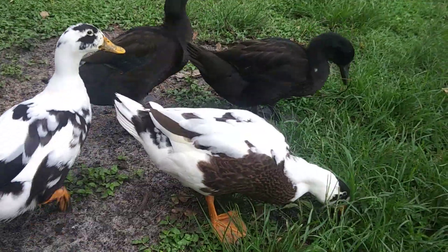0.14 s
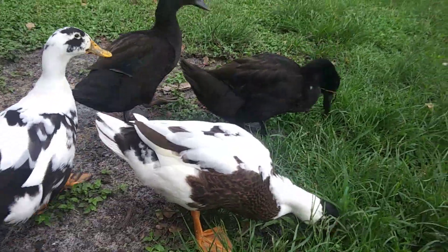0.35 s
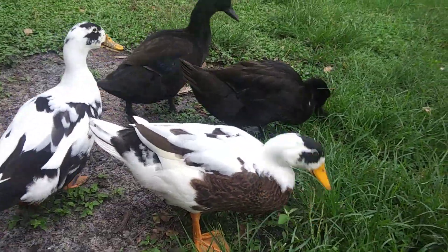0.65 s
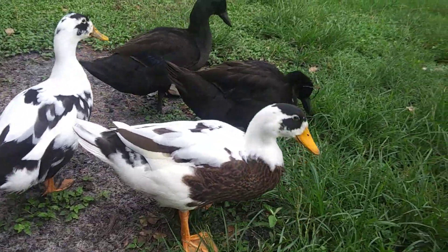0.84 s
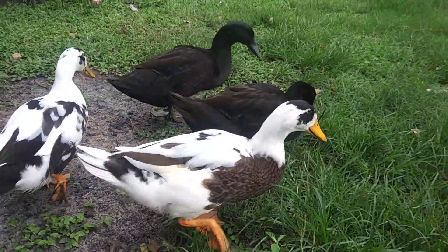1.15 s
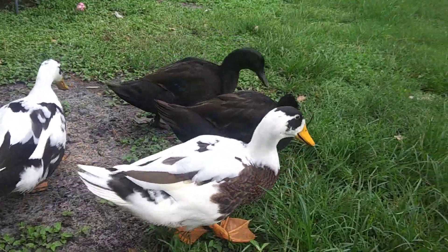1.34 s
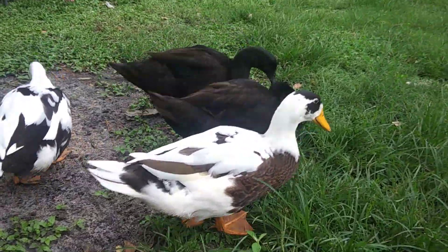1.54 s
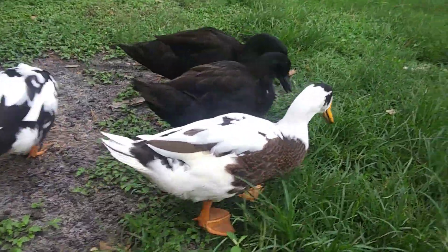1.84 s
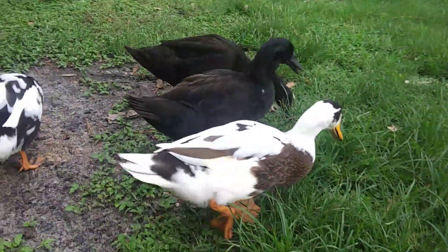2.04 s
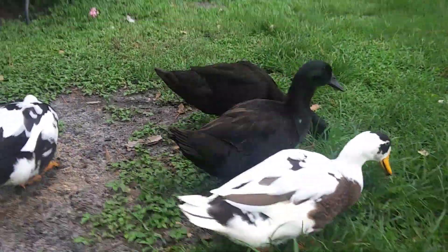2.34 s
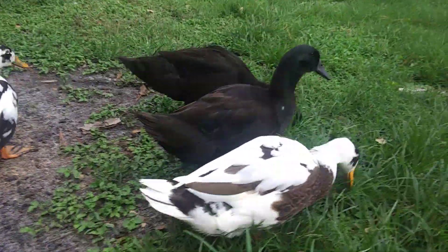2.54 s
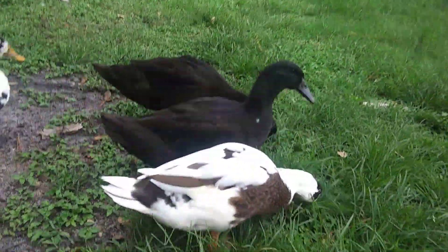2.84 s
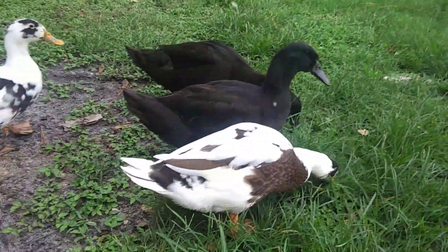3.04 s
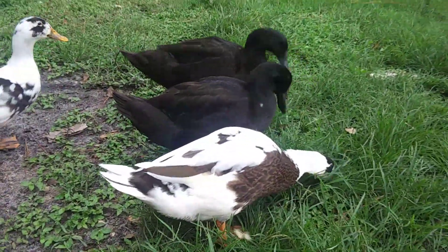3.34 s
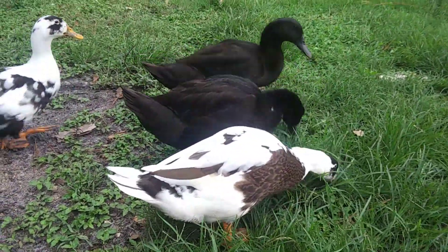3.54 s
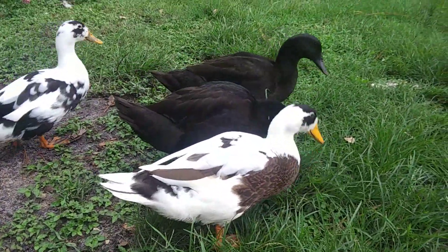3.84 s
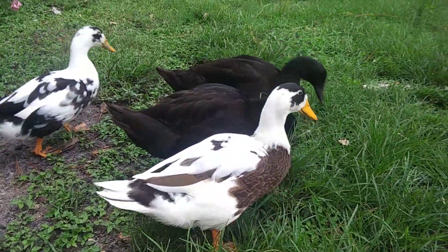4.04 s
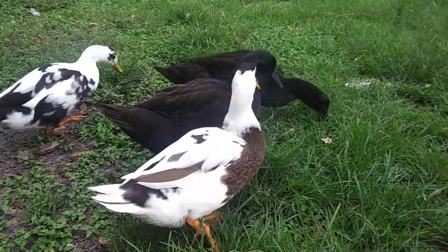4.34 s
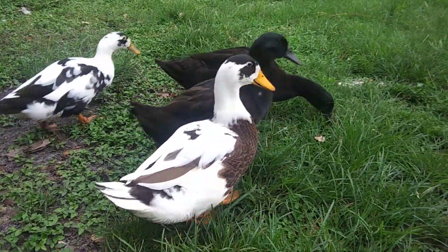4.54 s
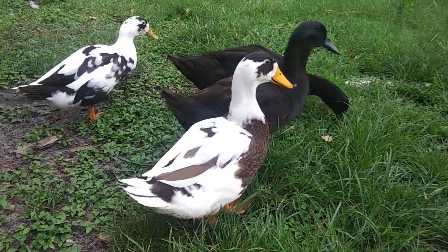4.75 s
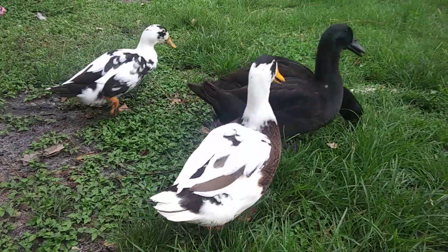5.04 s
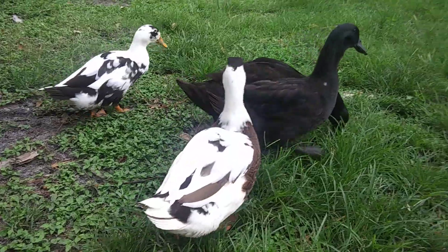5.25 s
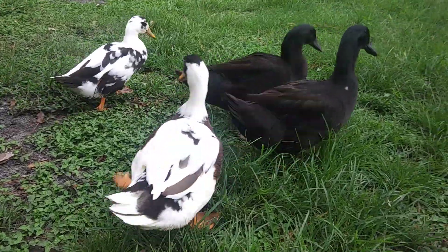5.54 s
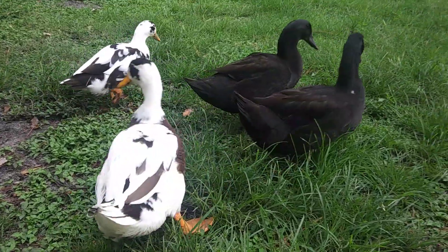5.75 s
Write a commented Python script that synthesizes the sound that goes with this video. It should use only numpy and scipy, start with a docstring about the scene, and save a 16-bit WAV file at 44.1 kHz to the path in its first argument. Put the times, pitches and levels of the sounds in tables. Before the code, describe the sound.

Close outdoor duck chatter: quick raspy quacks, falling peeps and clucks, crisp grass snaps, then a sharp honk breaking into a squeal.

```python
"""Young ducks forage on a lawn close to the microphone and keep up a soft chatter, built from membrane
slaps and puffs of air through throat resonances: rattling quacks, honks, clucks and hoarse rasps.
Gliding tones make thin peeps, a whine and, out of the last of three honks, a loud squeal.
Dull grunts, grass snaps and crackle are shaped noise; a weak yard echo, hiss and faint hum lie behind.
"""
import sys
import numpy as np
from scipy import signal
from scipy.fft import rfft, irfft, next_fast_len
from scipy.io import wavfile
from scipy.ndimage import map_coordinates

SR = 44100
rng = np.random.default_rng(int(sys.argv[2]) if len(sys.argv) > 2 else 0)


def transcribe(signal):
    """Save signal, clipped to [-1, 1], as a 16-bit WAV file at the path in sys.argv[1]."""
    frames = np.atleast_2d(signal).T
    limited = np.clip(frames, -1, 1)
    pcm = np.round(limited * 32767).astype(np.int16)
    wavfile.write(sys.argv[1], SR, pcm)


N = 260190
TIME = np.arange(N) / SR

# Resonances of windpipe and bill in quacks and clucks. Each row: centre in Hz, width in Hz, level in dB.
QUACK_THROAT = [(322, 368, -5.5), (659, 188, 1.5), (1096, 102, 7), (1269, 226, 3.5), (1800, 174, -1.5),
                (2220, 186, -4), (2814, 280, -12), (4210, 140, -1), (4760, 163, 5.5), (5220, 630, 1.5),
                (6420, 260, -1.5), (7340, 370, -25), (8430, 180, -17), (10060, 400, -59.5)]


def from_db(db):
    """Decibels to gain."""
    return 10 ** (np.asarray(db) / 20)


def rms_one(x):
    """Scale to unit power."""
    return x / np.sqrt(np.mean(x ** 2) + 1e-20)


def add(out, s, sound):
    """Mix a sound in from time s."""
    at = max(int(s * SR), 0)
    out[at:at + len(sound)] += sound[:max(N - at, 0)]


def in_time(rows):
    """Each column of a curve, after its times, at every sample."""
    s, *columns = np.transpose(rows)
    return [np.interp(TIME, np.sort(s), column) for column in columns]


def at_hz(points, hz):
    """Gain of a spectrum at these frequencies, joined on a logarithmic pitch axis."""
    f, db = np.transpose(points)
    return from_db(np.interp(np.log(np.maximum(hz, 1)), np.log(f), db))


def coloured(spectrum, size):
    """Noise with this spectrum, rms 1."""
    padded = next_fast_len(size)
    bins = rfft(rng.standard_normal(padded))
    hz = np.arange(len(bins)) * SR / padded
    return rms_one(irfft(bins * at_hz(spectrum, hz), padded)[:size])


def band(x, edges_hz, kind="band", order=3):
    """Butterworth filter."""
    edges_hz = np.clip(edges_hz, 10, .45 * SR)
    return signal.sosfilt(signal.butter(order, edges_hz, kind, fs=SR, output="sos"), x + 1e-18)


def drift(rate, size):
    """Random wander: normal values, this many a second, joined by straight lines."""
    knots = rng.standard_normal(4096)
    return np.interp(np.arange(size) * rate / SR, np.arange(len(knots)), knots)


def resonance(x, hz, width_hz):
    """Two-pole resonance, gain 1 on top."""
    r = np.exp(-np.pi * width_hz / SR)
    feedback = [1, -2 * r * np.cos(2 * np.pi * hz / SR), r * r]
    return signal.lfilter(np.array([1, 0, -1]) * (1 - r * r) / 2, feedback, x + 1e-18)


def registers(level_db, chest_db, bright_db, treble_db):
    """Levels of chest, throat, bill, buzz and edge registers; brightness lifts the upper three."""
    # Share of the brightness that bill, buzz and edge each take.
    bright_shares = (0.61, 0.88, 1)
    return level_db + np.r_[chest_db, 0, np.add(treble_db, np.multiply(bright_shares, bright_db))]


def call(length, rate_hz, rasp, register_db, throat, crest, sag_hz, swell_db, jitter, shimmer_db,
         second_beat, breath, puff_s, stretch):
    """One push of air: the syrinx membranes slap faster and harder towards its crest, and the throat rings."""
    # Borders of the chest, throat, bill, buzz and edge registers, in Hz.
    register_hz = [170, 800, 1600, 3500, 7200, 12000]
    bill_lift, treble_swell_db = 0.042, 6.5   # per unit of effort: share of pitch, and upper registers
    size = SR // 5
    t = TIME[:size]
    effort = np.sin(np.interp(t / length, [0, np.clip(crest, .1, .9), 1], [0, np.pi / 2, np.pi]))
    force = from_db(swell_db * (effort - 1)) * (t < length)
    rate = (rate_hz - sag_hz * (1 - effort)) * (1 + jitter * rasp * drift(250, size))
    cycles = np.cumsum(rate) / SR
    slaps = np.diff(np.floor(cycles), prepend=-1)
    # the second membrane closes out of step with the first
    late_slaps = np.diff(np.floor(cycles + .5 + 0.11 * drift(120, size)), prepend=0)
    unevenness = from_db(shimmer_db * rasp * drift(391.0, size))
    pulses = (slaps + second_beat * rasp * late_slaps) * force * unevenness
    # each slap lets through a puff of turbulent air
    fade = np.exp(-1 / (SR * puff_s * (.5 + rasp)))
    puff_shape = signal.lfilter([np.sqrt(1 - fade ** 2)], [1, -fade], pulses)
    puffs = puff_shape * rng.standard_normal(size)
    source = pulses + breath * rasp * puffs
    # neck and bill are held a little differently for every call
    shifts = 1 + stretch * rng.standard_normal(len(throat))
    voice = np.zeros(size)
    for k, (hz, width_hz, db) in enumerate(throat):
        voice += (-1) ** k * from_db(db) * resonance(source, hz * shifts[k], width_hz)
    # the opening bill lifts the resonances: the voice is read faster where effort is above its mean
    opening = (effort - 2 / np.pi) * (t < length)
    voice = map_coordinates(voice, [np.cumsum(1 + bill_lift * opening)], order=3)
    swells = [1, 1] + 3 * [from_db(treble_swell_db * opening)]
    total = np.zeros(size)
    for low_hz, high_hz, swell, db in zip(register_hz, register_hz[1:], swells, register_db):
        total += rms_one(band(voice, [low_hz, high_hz]) * swell) * from_db(db)
    return total * np.sqrt(length * SR / size)   # levels hold over the call, not the whole buffer


def whistle(length, first_hz, last_hz, octave_db=-16, third_db=-17):
    """A thin, unsteady tone that glides in pitch, its loudness following what the throat passes there."""
    # What the throat passes of a whistle. Each row: frequency in Hz, level in dB.
    whistle_throat = [(600, -1), (1000, -2), (1350, -11), (1650, -13), (1900, -16)]
    waver, flutter_db = .04, 4   # unsteadiness: share of pitch, and level in dB
    u = np.linspace(0, 1, int(length * SR))
    pitch = first_hz * (last_hz / first_hz) ** np.sin(np.pi / 2 * u ** 1.3) ** 2
    phase = 2 * np.pi * np.cumsum(pitch * (1 + waver * drift(673, len(u)))) / SR
    tone = np.sin(phase) + from_db(octave_db) * np.sin(2 * phase) + from_db(third_db) * np.sin(3 * phase)
    swell = np.abs(np.sin(np.pi * u)) ** 0.72
    flutter = from_db(flutter_db * drift(401, len(u)))
    return swell * at_hz(whistle_throat, pitch) * flutter * tone


def quacks():
    """Rattling quacks: distinct membrane slaps ring the windpipe and bill."""
    # Each row: start in seconds, length in seconds, level in dB before the trim below, rasp 0-1,
    # chest in dB against the level, nasal lift in dB, brightness in dB.
    quack_rows = [(0.010, 0.096, -28.5, 0.39, -13, -1.5, -3), (0.258, 0.097, -31, 0.24, -10.5, 0.5, 0.5),
                  (0.482, 0.091, -34, 0.26, -11.5, 0, 1), (0.65, 0.087, -33, 0.34, -11, -1, 0),
                  (0.726, .05, -34.5, 0.48, -2.5, -2.5, -5), (0.8, 0.072, -29.5, 0.24, -15.5, -0.5, -0.5),
                  (1.107, .094, -29, 0.3, -12, -5.5, -0.5), (1.235, .087, -31.5, 0.15, -12, -5, 4.5),
                  (2.907, 0.044, -38, 0.2, -17, 1, -8), (3.209, .15, -40, 0.81, -14.5, 1, -1),
                  (4.285, .06, -34, 0.42, -18, -6, 0)]
    # Bill, buzz and edge registers against the level, in dB.
    quack_treble_db = (-1, -4, -8)
    rate_hz = 190   # slaps per second at full effort
    out = np.zeros(N)
    for start, length, db, rasp, chest_db, nasal_db, bright_db in quack_rows:
        levels = registers(db, chest_db, bright_db, quack_treble_db) + [0, 0, nasal_db, 0, 0]
        add(out, start, call(length, rate_hz, rasp, levels, QUACK_THROAT,
                             crest=.47, sag_hz=70.07, swell_db=6, jitter=.15, shimmer_db=5,
                             second_beat=.4, breath=3.45, puff_s=0.0015, stretch=0.047))
    return out * from_db(-0.36)


def honks():
    """Forced calls: faster pulses through a tense throat with one strong nasal core."""
    # Each row: start in seconds, length in seconds, level in dB, pulse rate in Hz, rasp 0-1,
    # chest in dB against the level, brightness in dB.
    honk_rows = [(3.304, .118, -22.5, 236.6, .25, -13.5, 1.5), (4.724, 0.056, -22, 364, 0.14, -14.5, -5),
                 (5.383, .05, -22, 230, 0.23, -19.5, -10)]
    # Resonances of the tense throat. Each row: centre in Hz, width in Hz, level in dB.
    honk_throat = [(278, 100, -15), (970, 210, -8.5), (1205, 69, 3), (1414, 250, -3), (2340, 370, -6),
                   (3030, 400, -9), (4690, 680, -3.5), (5940, 620, -6.5), (7440, 1800, -18)]
    # Bill, buzz and edge registers against the level, in dB.
    honk_treble_db = (-7, -3, -33)
    out = np.zeros(N)
    for start, length, db, rate_hz, rasp, chest_db, bright_db in honk_rows:
        levels = registers(db, chest_db, bright_db, honk_treble_db)
        add(out, start, call(length, rate_hz, rasp, levels, honk_throat,
                             crest=.58, sag_hz=54.06, swell_db=7, jitter=0.18, shimmer_db=4,
                             second_beat=0.3, breath=2.16, puff_s=0.0039, stretch=.015))
    return out


def clucks():
    """Soft calls that start as a falling whistle and break into a few slaps as the pitch sinks."""
    # Each row: start in seconds, length in seconds, whistle in dB, rattle in dB, brightness in dB.
    cluck_rows = [(2.085, 0.068, -28.5, -27.5, 5), (2.269, 0.068, -28.5, -35.5, -0.5),
                  (2.455, 0.057, -26, -29.5, -2.5), (2.63, 0.063, -25.5, -31.5, -3.5),
                  (2.819, 0.079, -29.5, -40.5, 1), (3.024, 0.058, -26, -32, 5.5),
                  (4.468, .056, -29.5, -41, 6.5), (4.656, 0.059, -28.5, -29, 6.5),
                  (4.844, 0.065, -29.5, -34.5, -6), (5.109, 0.049, -31.5, -31, -6.5)]
    # Bill, buzz and edge registers against the rattle, in dB.
    cluck_treble_db = (-7, -11.5, -30.5)
    top_hz, last_hz, rate_hz = 1835, 677, 170   # whistle from and to; slaps per second at full effort
    whistle_ends, rattle_starts = .75, .31   # shares of a cluck's length
    out = np.zeros(N)
    for start, length, whistle_db, rattle_db, bright_db in cluck_rows:
        add(out, start, from_db(whistle_db) * whistle(whistle_ends * length, top_hz, last_hz))
        levels = registers(rattle_db, chest_db=-16.5, bright_db=bright_db, treble_db=cluck_treble_db)
        # short puffs keep the slaps distinct
        rattle = call((1 - rattle_starts) * length, rate_hz, 0.17, levels, QUACK_THROAT,
                      crest=.52, sag_hz=54.53, swell_db=8, jitter=0.17, shimmer_db=7,
                      second_beat=1.0, breath=4.7, puff_s=.0015, stretch=0.01)
        add(out, start + rattle_starts * length, rattle)
    return out


def hollow(x):
    """The open bill cuts a hollow between the nasal core of a call and its buzz."""
    hollow_hz, hollow_q = 3500, 7.4
    return signal.lfilter(*signal.iirnotch(hollow_hz, hollow_q, fs=SR), x + 1e-18)


def rasps():
    """Hoarse calls: uneven pulses drowned in air, through a narrow throat."""
    # Each row: start in seconds, length in seconds, level in dB before the lift below,
    # chest in dB against the level, brightness in dB.
    rasp_rows = [(0.929, .062, -36, 0, -2), (1.329, 0.064, -33.5, -7, -3), (1.746, 0.054, -34, -5, -8.5),
                 (1.98, 0.066, -32.5, -4.5, -8), (2.442, 0.027, -37, -9, -8.5),
                 (2.684, 0.043, -39, -2.5, -4.5), (3.709, 0.034, -43, -10, -0.5),
                 (3.908, 0.062, -48.5, -1, -7.5), (4.139, .045, -49, -2.5, 3.5),
                 (5.314, 0.056, -37, -2.5, -9.5)]
    # Resonances of the narrow throat. Each row: centre in Hz, width in Hz, level in dB.
    rasp_throat = [(360, 360, -20.5), (645, 106, -13.5), (1042, 80, 13), (1250, 200, -7), (1728, 51, 1.5),
                   (2140, 540, 1), (2700, 276, 12.5), (3990, 160, -1.5), (4550, 990, -3.5),
                   (5700, 510, -19), (6880, 290, -6.5), (7800, 540, -22), (9400, 1100, -43)]
    # Bill, buzz and edge registers against the level, in dB.
    rasp_treble_db = (-9.5, -5, -17)
    out = np.zeros(N)
    for start, length, db, chest_db, bright_db in rasp_rows:
        levels = registers(db, chest_db, bright_db, rasp_treble_db)
        add(out, start, call(length, 170, 1.0, levels, rasp_throat,
                             crest=0.42, sag_hz=30.18, swell_db=2, jitter=0.2, shimmer_db=-2.5,
                             second_beat=0.48, breath=6.0, puff_s=0.003, stretch=0.0063))
    return out * from_db(3.25)


def peeps():
    """Thin whistles, alone or together with other calls, nearly all falling."""
    # Each row: start in seconds, length in seconds, first pitch in Hz, last pitch in Hz,
    # level in dB ahead of the throat.
    peep_rows = [(0.441, .048, 1250, 630, -38.5), (1.401, 0.051, 953, 677, -40),
                 (1.591, 0.046, 1250, 683, -41), (1.672, .036, 1410, 1880, -36.5),
                 (1.906, .052, 1820, 1007, -26.5), (2.685, 0.046, 814, 484, -39.5),
                 (3.565, 0.072, 1376, 592, -41), (3.713, .068, 1586, 641, -34),
                 (3.917, 0.047, 1380, 655, -35.5), (4.13, 0.042, 1433, 680, -34)]
    out = np.zeros(N)
    for start, length, first_hz, last_hz, db in peep_rows:
        add(out, start, from_db(db) * whistle(length, first_hz, last_hz))
    return out


def whine(harmonic_db=(0, -3, -22, -25, -21)):
    """A closed-bill hum with a strong octave; its pitch swings quickly down and up."""
    start_s, length_s, level_db = .118, 0.13, -37.5
    centre_hz, swing_hz, period_s = 572, 86, .088
    out, t = np.zeros(N), TIME[:int(length_s * SR)]
    pitch = centre_hz + swing_hz * np.cos(2 * np.pi * t / period_s)
    phase = 2 * np.pi * np.cumsum(pitch * (1 + 0.032 * drift(315, len(t)))) / SR
    tone = sum(from_db(db) * np.sin(k * phase) for k, db in enumerate(harmonic_db, 1))
    swell = np.sin(np.pi * t / length_s) ** 0.12
    add(out, start_s, from_db(level_db) * swell * tone)
    return out


def squeal(waver=0.015, flutter_db=-1.0, hiss_db=-22, tone_db=4, overtone_db=7.5):
    """The voice breaks into a high arching tone, its overtones shaped by the open bill."""
    # Each row: time in seconds, pitch in Hz, fundamental in dB before tone_db,
    # overtones in dB before overtone_db.
    squeal_curve = [(5.416, 1304, -31, -44), (5.432, 1424, -9, -17.5), (5.444, 1596, -19.5, -17),
                    (5.456, 1560, -22, -12), (5.472, 1380, -15.5, -27), (5.495, 1120, -38, -43.5)]
    # What the open bill passes of the overtones. Each row: frequency in Hz, level in dB.
    open_bill = [(2600, -14), (3200, -21.5), (3800, -17.5), (4300, -14), (4750, -9), (5300, -4),
                 (5850, -10), (6350, -14.5), (7000, -30.5), (7900, -21), (8800, -45), (9600, -37),
                 (12000, -79)]
    on = (TIME > squeal_curve[0][0]) & (TIME < squeal_curve[-1][0])
    pitch, db, overtones_db = [column[on] for column in in_time(squeal_curve)]
    size = len(pitch)
    phase = 2 * np.pi * np.cumsum(pitch * (1 + waver * drift(630, size))) / SR
    overtones = np.zeros(size)
    for k in range(2, 9):
        flutter = from_db(flutter_db * drift(540, size))
        overtones += at_hz(open_bill, k * pitch) * np.sin(k * phase) * flutter
    hiss = from_db(hiss_db) * band(coloured(open_bill, size), 480, "high")
    fundamental = from_db(db + tone_db) * np.sin(phase)
    out = np.zeros(N)
    out[on] = fundamental + from_db(overtones_db + overtone_db) * (overtones + hiss)
    return out


def grunts(rise_s=0.0087, flutter_db=4):
    """Short dull grunts: puffs of low noise that rise fast and die away."""
    # Each row: time in seconds (the onset is 2 ms ahead), level in dB before the trim below.
    grunt_rows = [(0.416, -38.5), (1.379, -38), (1.569, -37), (1.726, -38.5), (3.533, -36.5),
                  (3.694, -32.5), (3.897, -44), (4.105, -41), (4.26, -37.5), (4.849, -38)]
    # Spectrum of a grunt. Each row: frequency in Hz, level in dB.
    grunt_colour = [(130, -36), (220, 2), (380, 8.5), (650, 0.5), (1100, 1.5), (2200, -12.5), (4500, -6),
                    (7000, -13), (14000, -47)]
    out, t = np.zeros(N), TIME[:SR // 12]
    for s, db in grunt_rows:
        shape = t / rise_s * np.exp(1 - t / rise_s) * from_db(flutter_db * drift(498, len(t)))
        add(out, s - .002, from_db(db - 3.5) * shape * coloured(grunt_colour, len(t)))
    return out


def grass(snap_s=0.0025, rustles_per_s=28, rustle_db=-50):
    """Blades snap in the bills as fast-dying noise; many more crackle faintly underfoot at random."""
    # Bills snapping blades. Each row: time in seconds, level in dB before the trim below.
    snap_rows = [(0.197, -25.5), (0.396, -34), (0.6036, -24.5), (1.6131, -29), (3.699, -25), (4.24, -26),
                 (4.2904, -27), (4.3307, -18), (5.247, -27), (5.2821, -25.5)]
    top_db = -25   # the very top of a snap, against its body
    out, t = np.zeros(N), TIME[:SR // 50]
    for s, db in snap_rows:
        crack = rng.standard_normal(len(t)) * np.exp(-t / snap_s)
        body = band(crack, [3200, 7500], order=2)
        top = from_db(top_db) * band(crack, 12000, "high")
        add(out, s, from_db(db - 1.5) * (body + top))
    strengths = from_db(1.13 * np.minimum(rng.exponential(1, N), 3))
    ticks = (rng.random(N) < rustles_per_s / SR) * strengths
    envelope = signal.lfilter([1], [1, -np.exp(-1 / (snap_s * SR))], ticks + 1e-18)
    crackle = envelope * rng.standard_normal(N)
    return out + from_db(rustle_db) * band(crackle, [2500, 9000], order=1)


def yard(x):
    """Trees and walls scatter back a weak, lingering echo: decaying coloured noise as impulse response."""
    # Spectrum of the echo. Each row: frequency in Hz, level in dB.
    yard_colour = [(150, -34), (500, 4.5), (1400, -11), (3000, -4), (5000, -7.5), (8000, -16), (15000, -44)]
    t60_s, echo_db = 0.69, -26
    t = TIME[:SR]
    echo = coloured(yard_colour, len(t)) * from_db(-60 * t / t60_s) * (1 - np.exp(-t / 0.0037))
    return from_db(echo_db) * signal.fftconvolve(x, rms_one(echo) / np.sqrt(len(t)))[:N]


def outdoors(split_hz=7800):
    """Hiss behind the flock, low and high parts slowly shifting in level, the high part loud at first and
    fading; a faint wavering hum far away."""
    # Spectrum of the hiss. Each row: frequency in Hz, level in dB.
    air_colour = [(35, -59), (60, -12), (189, -8), (217, 3.5), (294, 2), (553, -4.5), (621, 0), (749, -3.5),
                  (822, 2.5), (1470, 2), (1580, -2.5), (2190, -8.5), (3580, -8.5), (5860, -3.5),
                  (16000, -23.5)]
    # Each row: time in seconds, low part in dB, high part in dB, both before the trims below.
    air_level = [(0.0, -44.5, -48.5), (0.89, -49.5, -50), (2.86, -46.5, -65.5), (5.9, -48.5, -64)]
    hum_hz, hum_db = 234.6, -65.5
    low_db, high_db = in_time(air_level)
    air = coloured(air_colour, N)
    low = from_db(low_db - 4.5) * rms_one(band(air, split_hz, "low", order=5))
    high = from_db(high_db - 6.5) * rms_one(band(air, split_hz, "high", order=5))
    hum_phase = 2 * np.pi * np.cumsum(hum_hz + 3 * drift(21, N)) / SR
    hum = np.sin(hum_phase) * from_db(hum_db + 3.4 * drift(27.0, N))
    return low + high + hum


def scene():
    """The flock in its yard, as one channel."""
    pulsed_calls = hollow(quacks() + honks() + clucks())
    flock = pulsed_calls + rasps() + peeps() + whine() + squeal() + grunts() + grass()
    return (flock + yard(flock) + outdoors())[None]


def record(dry):
    """A small microphone with no bass; the top is cut."""
    cutoff_hz = 15900
    thin = band(dry, 152, "high", order=4)
    return signal.sosfilt(signal.ellip(10, .1, 80, cutoff_hz, fs=SR, output="sos"), thin)


dry = scene()
out = record(dry)
transcribe(out)
```